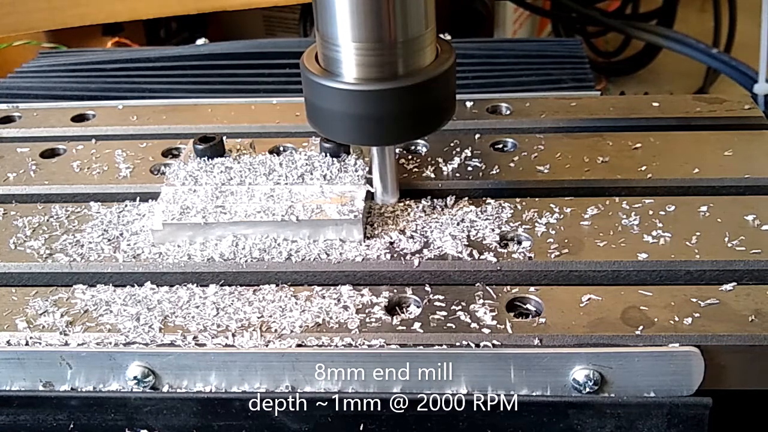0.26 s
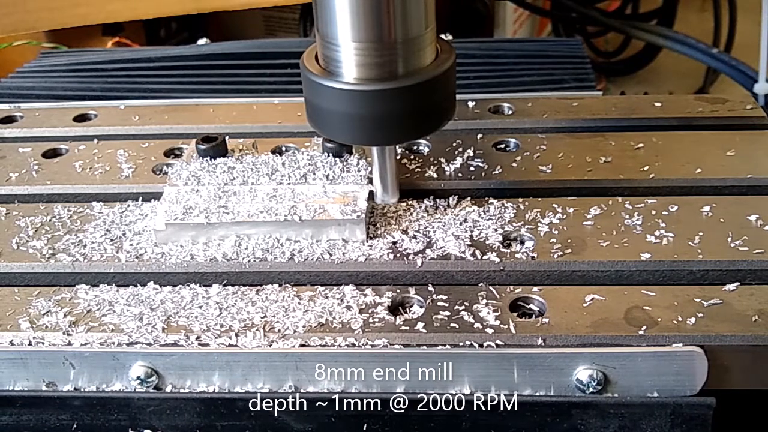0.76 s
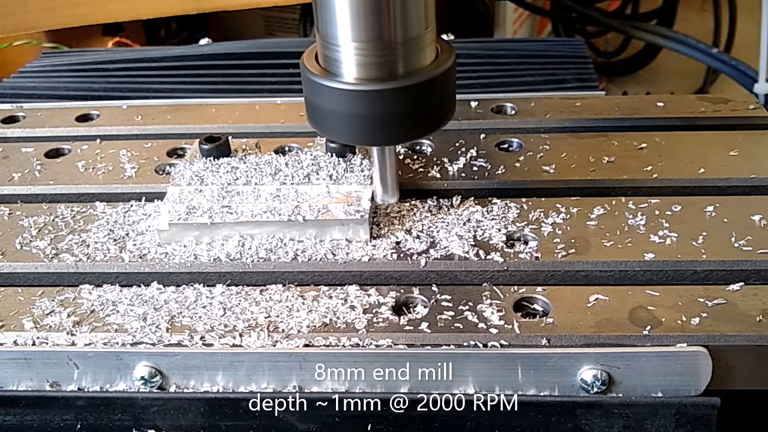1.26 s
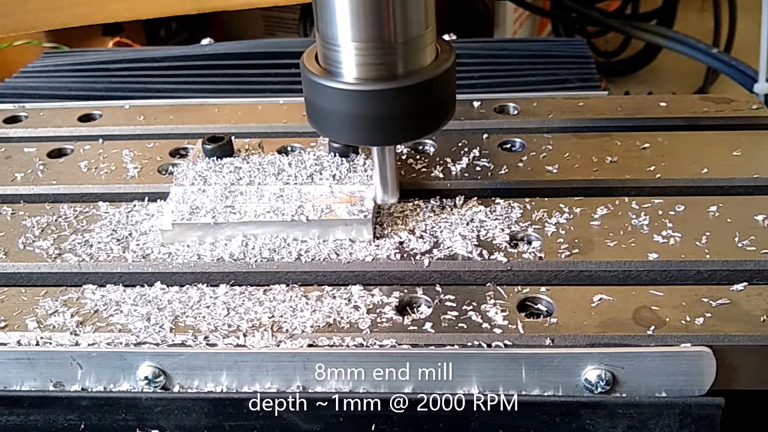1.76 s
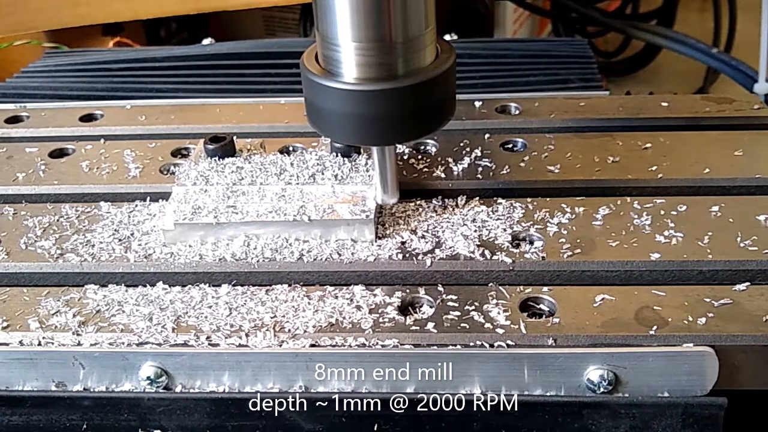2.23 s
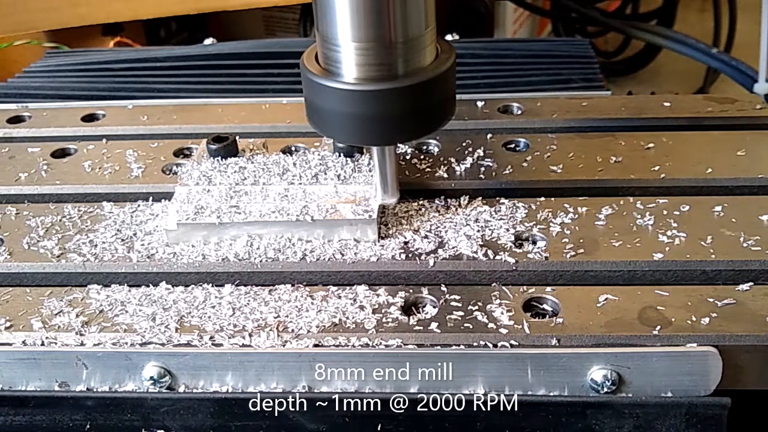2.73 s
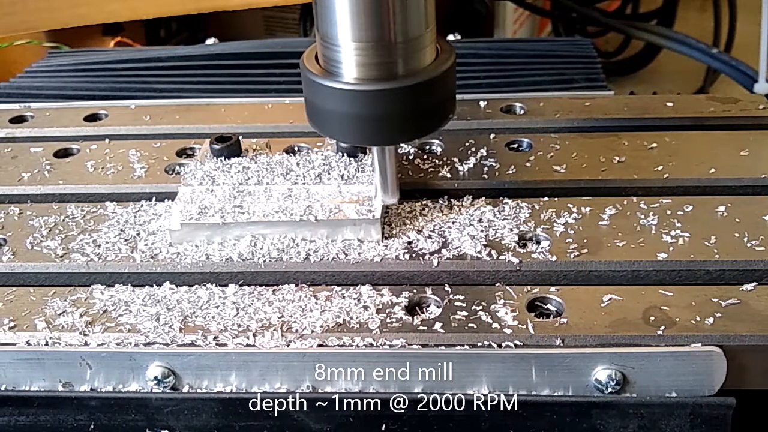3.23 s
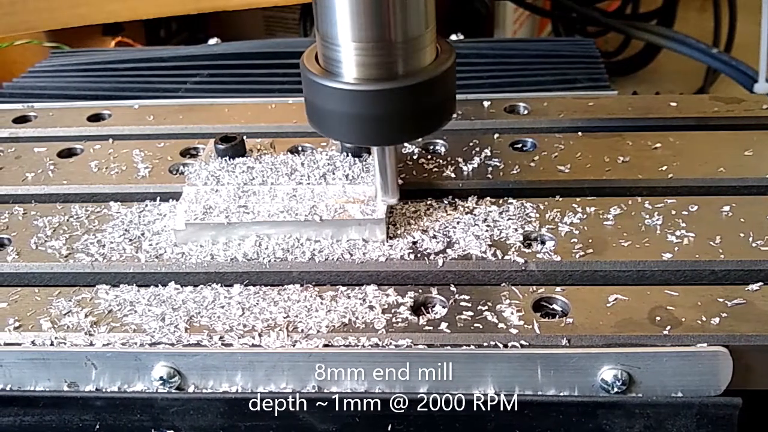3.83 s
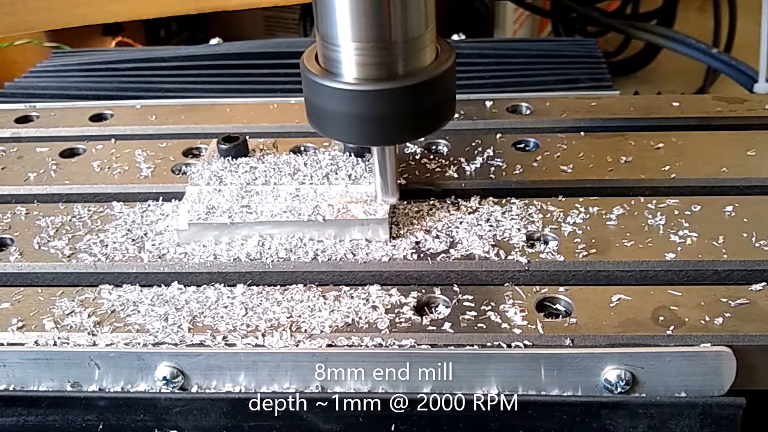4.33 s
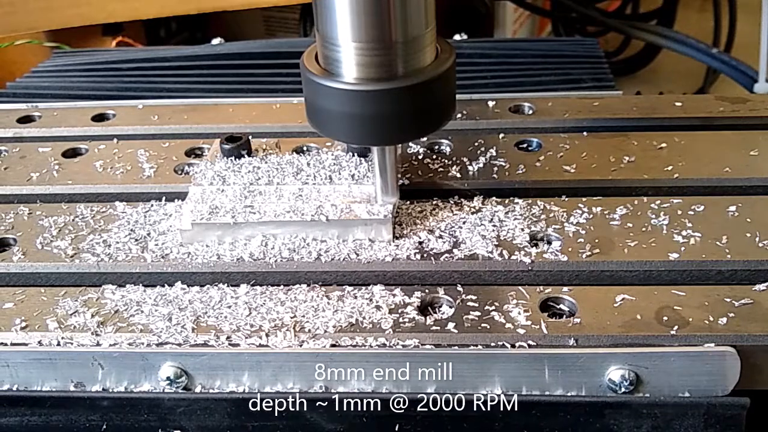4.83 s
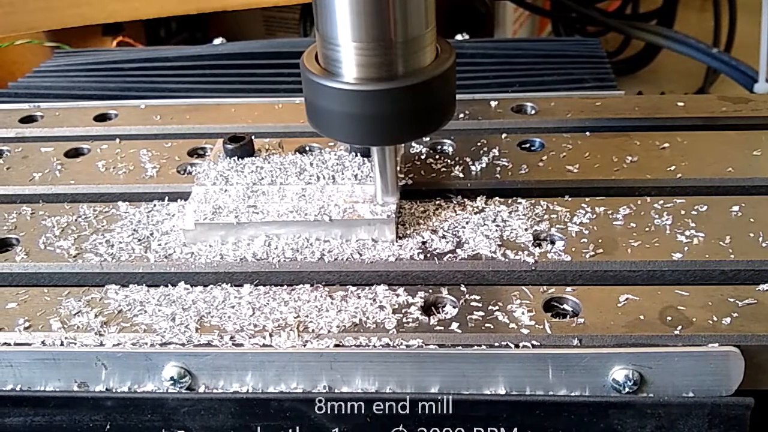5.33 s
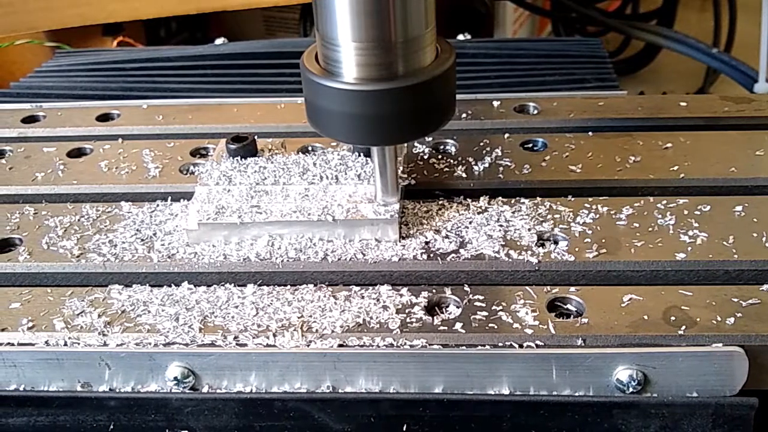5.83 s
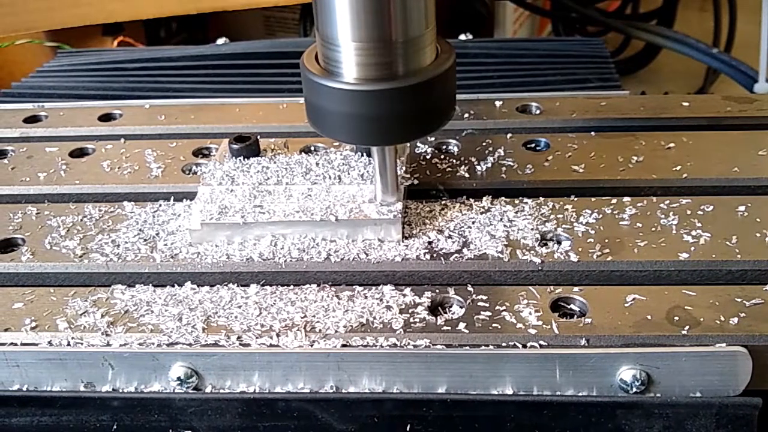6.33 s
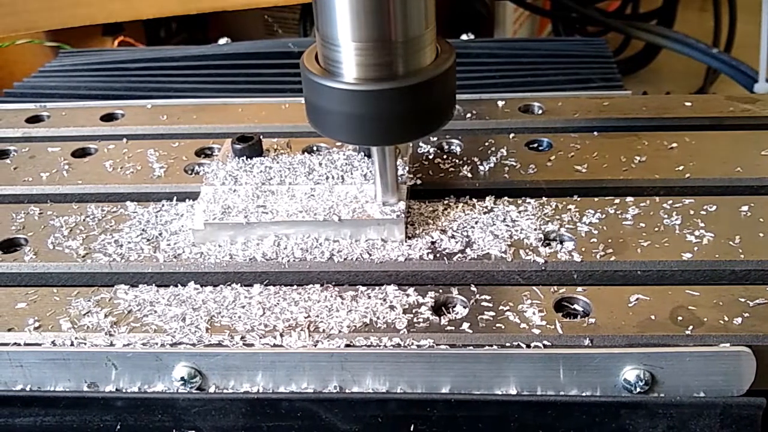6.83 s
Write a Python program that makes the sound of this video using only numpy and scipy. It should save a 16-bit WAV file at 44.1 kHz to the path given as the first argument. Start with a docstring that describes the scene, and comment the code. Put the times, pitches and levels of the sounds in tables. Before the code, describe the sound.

A small milling spindle idles with hiss and a singing belt whine, then its cutter bites aluminium in a droning, chattering, increasingly loud rattle.

```python
"""First a small milling machine idles: its frame rumbles, bearings hiss, the belt sings and the motor drive whines.
Then a four-flute cutter bites into aluminium: its teeth drone and thump, the frame chatters and chips scrape off.
Rumble, hiss, chatter and scrape are filtered noise; hums, belt, whine and drone are sines; bites are short rings.
The right channel is a shifted, recoloured copy of the left, mixed with unrelated sound."""
import sys
import numpy as np
from scipy import signal
from scipy.fft import rfft, irfft, next_fast_len
from scipy.io import wavfile
from scipy.ndimage import uniform_filter1d, map_coordinates

SR = 44100
rng = np.random.default_rng(int(sys.argv[2]) if len(sys.argv) > 2 else 0)


def output_pcm(signal):
    """Save a mono or channel-first signal as 16-bit PCM at the path in sys.argv[1].

    Samples are clipped to [-1, 1] before scaling.
    """
    pcm = np.clip(np.atleast_2d(signal).T, -1, 1) * 32767
    wavfile.write(sys.argv[1], SR, np.round(pcm).astype(np.int16))


N = 311787
TIME = np.arange(N) / SR  # seconds
SCATTER_GROWS = 0.09  # radians of unsteadiness that belt and drone gain per second of cutting
ENTRY_S = 0.04  # time scale for the tool sinking into the work


def amp(db):
    """Turn dB into gain."""
    return 10 ** (np.asarray(db) / 20)


def unit(x):
    """Scale to an average (rms) level of 1."""
    return x / np.sqrt(np.mean(x ** 2) + 1e-20)


def along(points, hz):
    """Read a curve of (Hz, value) points on a log frequency axis."""
    f, v = np.transpose(points)
    return np.interp(np.log(hz + 1), np.log(f + 1), v)


def wobble(rate):
    """A smooth random curve with this many random points a second."""
    return map_coordinates(rng.standard_normal(int(N * rate / SR) + 4), [TIME * rate])


def bumps(rows):
    """Add up smooth rises in dB; a negative height makes a dip."""
    return sum(db * np.exp(-((TIME - s) / length) ** 2) for s, db, length in rows)


def filtered(x, response):
    """Reshape the spectrum of x with a complex response of frequency."""
    m = next_fast_len(N + SR // 2)
    return irfft(rfft(x, m) * response(np.fft.rfftfreq(m, 1 / SR)), m)[..., :N]


def noise(patchy_db):
    """Two unrelated noises that share patches of random gain in time and frequency."""
    z = signal.stft(rng.standard_normal((2, N)), nperseg=512)[2]
    field = uniform_filter1d(rng.standard_normal(z.shape[1:]), size=8, axis=0)
    field = uniform_filter1d(field, size=6, axis=1)
    return signal.istft(z * amp(patchy_db * unit(field)), nperseg=512)[1][:, :N]


def tone(hz, db, unsteady_db):
    """A sine whose level and phase drift at random."""
    gain = np.sqrt(2) * amp(db + unsteady_db * wobble(7.6))
    return gain * np.sin(2 * np.pi * hz * TIME + 0.32 * unsteady_db * wobble(4.68))


# resonances of the frame; levels are relative: pitch_hz, width_hz, idle_level_db, chatter_level_db
FRAME_MODES = [(220, 62, -15, -9), (309.4, 39, -11.5, 0), (418, 68, -16.5, -5.5), (578, 62, -8, -0.5),
               (680, 98, 2.5, 4), (706, 72, 4, 4.5), (833, 40, -9.5, -9.5), (901, 24, -19, -9.5),
               (1029, 26, -28, -13.5), (1187, 26, -19, -10.5), (1249.6, 40, -10, -15),
               (1411, 28, -8.5, -23), (1566, 75, -9, -14.5), (1945, 37, -16, -30)]


def frame(force, column):
    """A force shakes the frame's resonances, each as strong as the chosen column says."""
    def modes(f):
        total = 0
        for k, mode in enumerate(FRAME_MODES):
            hz, width = mode[:2]
            resonance = 1j * f * width / (hz ** 2 - f * f + 1j * f * width)
            total = total + (-1) ** k * amp(mode[column]) * resonance  # neighbours have opposite signs
        return total
    return unit(filtered(force, modes))


def idle_rumble():
    """Noise shakes the frame while the spindle turns."""
    return amp(-36.0 + 0.35 * wobble(15)) * frame(noise(patchy_db=2.5), column=2)


POLES_HZ = 308.8  # how often the motor poles pass

# relative colour of bearings and belt: pitch_hz, level_db (per Hz)
HISS_COLOUR = [(40, -16), (110, -2.5), (180, -7), (500, 0), (950, -2), (1800, -4.5), (2350, -6),
               (3000, 0.5), (3400, -4), (4000, -2), (5200, -5.5), (6200, -1.5), (8300, -3), (9600, -4.5),
               (11900, -0.5), (13500, -2.5), (15500, -3.5)]
# humps that the spindle housing adds: pitch_hz, width_hz, lift_db
HOUSING_HUMPS = [(8950, 500, 4.5), (10750, 1100, 4), (12450, 600, 3), (14250, 600, 5)]


def bearing_hiss():
    """Bearings and belt make noise, which the motor poles pulse and the housing colours."""
    poles = 1 + 0.07 * np.sin(2 * np.pi * POLES_HZ * TIME)
    pulsed = noise(patchy_db=1.28) * amp(0.084 * wobble(38)) * poles

    def colour(f):
        lift_db = sum(db * np.exp(-((f - hz) / width) ** 2 * 2) for hz, width, db in HOUSING_HUMPS)
        return amp(along(HISS_COLOUR, f) + lift_db)
    hiss = amp(-30.5) * unit(filtered(pulsed, colour))
    treble = filtered(hiss, lambda f: 1 / (1 + (7000 / (f + 1)) ** 4))
    return hiss + treble * (amp(1.1 * wobble(110)) - 1)  # the treble flutters as a whole


# steady tones of motor and fans: pitch_hz, level_db (rms)
STEADY_TONES = [(100, -64), (200.3, -51), (400.6, -56), (524, -54), (1404, -51), (1428, -53)]
# hum that fades as the tool enters the work: pitch_hz, idle_level_db (rms)
IDLE_TONES = [(155, -60), (308.4, -49)]


def motor_tones():
    """Motor and fans hum on drifting sines; the idle hum gives way once the tool cuts."""
    steady = sum(tone(hz, db, 1) for hz, db in STEADY_TONES)
    idle = sum(tone(hz, db, 1) for hz, db in IDLE_TONES)
    return steady + idle * np.exp(-cutting() / ENTRY_S)


BELT_HZ, BELT_CLIMB_HZ, PULLEY_TEETH = 1233.3, 0.55, 48  # pitch at the start, its rise a second, teeth a turn
BELT_DB, BELT_SAG, BELT_WAVER_DB = -40.5, 0.85, 0.3  # idle dB; dB lost and waver dB gained a second of cutting
BELT_SWING = 0.15  # radians by which the tone's phase swings once a turn

# throbbing as the pulley turns: throbs_per_turn, depth_0_to_1, start_radians
BELT_THROBS = [(1, .58, -2.45), (2, .22, 2.0)]
# surges of the belt tone under load: time_s (middle), lift_db, length_s
BELT_SURGES = [(4.03, 10.5, 0.04), (4.41, 7, 0.015), (4.55, 12, .02), (5.4, 8, .03), (7.06, 13, 0.036)]


def belt_tone():
    """Belt teeth meeting the pulley sing a slowly rising tone that throbs with each turn."""
    cycles = (BELT_HZ + BELT_CLIMB_HZ * TIME / 2) * TIME
    turns = cycles / PULLEY_TEETH
    throb = 1 + sum(depth * np.cos(2 * np.pi * times * turns + start) for times, depth, start in BELT_THROBS)
    swing = BELT_SWING * np.sin(2 * np.pi * turns + BELT_THROBS[0][2])
    swing += SCATTER_GROWS * cutting() * wobble(20)
    level_db = BELT_DB + cutting() * (BELT_WAVER_DB * wobble(7.5) - BELT_SAG) + bumps(BELT_SURGES)
    return np.sqrt(2) * amp(level_db) * throb * np.sin(2 * np.pi * cycles + swing)


WHINE_HZ = 10820.9  # pitch of the drive tone

# drive tone (third row) and side tones, one pole rate apart from low to high: level_db (rms)
WHINE_LEVELS = [-55.5, -53.5, -45, -52.5, -53, -54.5]


def drive_whine():
    """The motor drive whines on one high tone with side tones spaced by the pole rate."""
    return sum(tone(WHINE_HZ + (k - 2) * POLES_HZ, db, 0.74) for k, db in enumerate(WHINE_LEVELS))


def spindle():
    """The turning spindle: rumble, hiss, motor tones, belt and drive whine together."""
    return idle_rumble() + bearing_hiss() + motor_tones() + belt_tone() + drive_whine()


FULL_DB = -27  # tool load at which the drone, thump and scrape levels hold
FLICKER_DB = 0.5  # unsteadiness of the load

# load on the tool before slack and flicker: time_s, load_db (as chatter level)
CUT_LOAD = [(1.88, -43), (1.92, -45), (2.02, -33), (2.65, -32.5), (3.2, -36), (3.5, -30), (3.65, -25),
            (3.74, -33.5), (3.95, -23.5), (4.3, -27.5), (4.87, -26.5), (5.059, -27.5), (5.2, -24.5),
            (5.4, -30.5), (5.97, -29.5), (6.03, -27.5), (6.3, -24.5), (6.6, -24.5), (6.851, -28),
            (7.07, -19)]
# moments when the tool runs light: time_s (middle), drop_db (negative lifts), length_s
SLACK_MOMENTS = [(2.10, 6.5, 0.026), (2.33, 11, 0.032), (2.53, 14, 0.03), (2.94, 6, 0.018), (3.1, 2, .04),
                 (3.43, 4, 0.017), (3.85, 2, 0.028), (4.44, 2, 0.046), (4.6, 5.5, 0.041), (4.78, 2, 0.078),
                 (4.93, 7.5, 0.03), (5.07, 6, 0.028), (5.7, -2.5, 0.098), (6.5, 4.5, 0.046),
                 (6.87, 3.5, 0.02)]


def tool_load():
    """The cut loads the tool: return the steady load, the slack and the resulting load, in dB."""
    s, db = np.transpose(CUT_LOAD)
    steady_db = np.interp(TIME, s, db, left=-120)  # practically silent before the cut
    slack_db = bumps(SLACK_MOMENTS)
    return steady_db, slack_db, steady_db - slack_db + FLICKER_DB * wobble(14)


def cutting():
    """Seconds since the tool met the work."""
    return np.clip(TIME - CUT_LOAD[0][0], 0, None)


# cutter speed: time_s, teeth_hz (teeth a second)
TOOTH_RATE = [(1.7, 102.6), (3.2, 102.5), (3.8, 103.0), (7.07, 103.1)]


def teeth_passed():
    """The turning cutter brings tooth after tooth: a running count with fractions."""
    return np.cumsum(np.interp(TIME, *np.transpose(TOOTH_RATE))) / SR + 0.75


WAVER_DB = 1.0  # own unsteadiness of each drone tone

# drone tones: times_tooth_rate (2.25 is nine times the turn rate), level_db (rms at full load and loudest time),
# growth (dB per dB of load), slack_share (of the drop), loudest_s, fall_db_per_s (away from loudest_s)
DRONE_TONES = [(1, -45, 0.051, 0.25, 3.4, 4), (2, -38.5, 0.41, 1.6, 2.04, 3), (3, -36, 0.072, 1.5, 2, 1.5),
               (4, -38.5, 0.26, 1.7, 1.44, 1.4), (6, -43, 0.8, 1.2, 1.4, 3.5),
               (7, -36.5, 0.43, 2.7, 1.8, 0.5), (2.25, -40.5, 0.59, 0.43, 7.5, 1.5)]
# swells and dips of the drone: time_s (middle), second_multiple_db, third_multiple_db, fourth_multiple_db, length_s
DRONE_SWELLS = [(1.96, 8, 0.5, -4, 0.045), (2.43, 4, -3, 5, 0.06), (2.95, 5.5, 0, 4.5, 0.14),
                (3.4, -26, 4, 10, 0.03), (3.54, -18, -8, 13.5, 0.09), (3.65, 10, 5, 11, 0.037),
                (3.93, 5, 5, 4, 0.036), (4.12, 10, 5, 11, 0.025), (4.22, 9.5, 6, 16, 0.071),
                (4.49, 14, -3, -9, 0.033), (4.7, 10, 9, 11.5, 0.065), (4.87, 15, 8, 10, .04),
                (5.17, 3, 0, 14.5, 0.19), (5.29, 1, 0, 0, 0.041), (5.53, -10, 5, 17, 0.029),
                (5.85, 14, 21.5, -7, 0.014), (6.05, 6, 10.5, 11, 0.054), (6.33, 10, 5, 17.5, 0.1),
                (6.6, 11, 10, 15.5, 0.05), (6.74, 12, 16, 13, 0.085), (7.039, 17, 21, 17, 0.12)]


def tooth_drone(count, steady_db, slack_db):
    """Teeth drone on multiples of the tooth rate, plus one tone at nine times the turn rate."""
    swells, drone = np.array(DRONE_SWELLS), 0
    for k, (times, db, grows, share, top_s, fall_db) in enumerate(DRONE_TONES):
        swell_db = bumps(swells[:, [0, k, 4]]) if 1 <= k <= 3 else 0
        level_db = db + grows * (steady_db - FULL_DB) + swell_db - fall_db * np.abs(TIME - top_s)
        level_db = level_db - share * slack_db + WAVER_DB * wobble(12)
        scatter = (0.3 + SCATTER_GROWS * cutting()) * wobble(9)  # radians
        drone = drone + np.sqrt(2) * amp(level_db) * np.sin(2 * np.pi * times * count + scatter)
    engaged = np.clip(cutting() / ENTRY_S, 0, 1) ** 2
    return engaged * drone


BLOW_DB, BLOW_GROWS = -35.5, 0.54  # tooth blows at full load; dB per dB of load

# relative colour of a tooth blow: pitch_hz, level_db
THUMP_COLOUR = [(30, -1), (70, -0.5), (130, -13), (200, -6.5), (231, 0), (262, 6.5), (308, -5.5), (390, 9),
                (513, -30), (615, -28), (718, -10), (822, 0), (900, -30), (1200, -19), (2000, -60) ]


def tooth_thump(tooth, size_db, luck, over_db):
    """Each tooth hits the work with a click of uneven strength, filtered into a thump."""
    strikes = np.diff(tooth, prepend=tooth[0]) > 0
    blows = strikes * amp(2.3 * size_db + 2.1 * np.clip(luck, -2, 1.5))
    return amp(BLOW_DB + BLOW_GROWS * over_db) * unit(filtered(blows, lambda f: amp(along(THUMP_COLOUR, f))))


RATTLE_DB = -2.5  # loose chatter between the bites, against the load


def loose_chatter(force, chatter_db, share):
    """Noisy cutting forces rattle the frame, less while a bite takes over."""
    chatter = frame(noise(patchy_db=3.0) * force * amp(chatter_db) * (1 - share), column=3)
    return chatter * amp(RATTLE_DB) * np.sqrt(np.mean(amp(chatter_db) ** 2))


LIGHT_DB, LIGHT_SPREAD_DB = 3.5, 2  # light bite strength over the load, and its random spread
LIGHT_HZ, LIGHT_SPREAD_HZ, LIGHT_S = 640, 52, 0.007  # pitch, its random spread, length in seconds


def light_bites(tooth, load_db):
    """Every flute bites lightly as it enters, the off-centre ones hardest: list the bites."""
    starts = np.flatnonzero(np.diff(tooth)) + 1
    luck = np.clip(rng.standard_normal((len(starts), 3)), -2, 1.5)
    rows = []
    for i, (a, b, c) in zip(starts, luck):
        if i / SR > CUT_LOAD[0][0]:
            level_db = load_db[i] + LIGHT_DB + LIGHT_SPREAD_DB * a
            rows.append((i / SR + 0.001 * c, level_db, LIGHT_HZ + LIGHT_SPREAD_HZ * b, LIGHT_S))
    return rows


# heavy bites: start_s, level_db (ring strength before its soft start and fade), pitch_hz, length_s
HEAVY_BITES = [(1.943, -18.5, 698, 0.012), (1.983, -17.5, 656, 0.0096), (2.02, -20.5, 627, 0.0091),
               (2.046, -17.5, 605, 0.0083), (2.177, -19.5, 660, 0.0088), (2.217, -20.5, 634, 0.0096),
               (2.255, -23, 670, 0.014), (2.369, -22, 660, 0.017), (2.404, -20.5, 690, 0.011),
               (2.448, -17.5, 666, 0.0095), (2.559, -20, 706, 0.013), (2.606, -19, 654, 0.0093),
               (2.644, -19, 697, 0.0066), (2.674, -21, 680, 0.015), (2.753, -22.5, 704, 0.018),
               (2.801, -22, 686, 0.014), (2.998, -18, 630, 0.0072), (3.027, -13, 694, 0.0034),
               (3.075, -20, 654, 0.0058), (3.107, -22, 650, 0.0092), (3.152, -20.5, 650, .01),
               (3.546, -16, 655, 0.0099), (3.61, -16, 640, 0.0067), (3.636, -14, 700, 0.0069),
               (3.647, -14, 594, 0.013), (3.766, -23, 583, .01), (3.883, -19, 620, 0.016),
               (3.93, -15, 613, 0.01), (3.973, -16.5, 666, 0.015), (4.005, -19.5, 604, 0.017),
               (4.043, -20.5, 594, 0.018), (4.1, -22, 580, 0.011), (4.135, -15, 680, 0.0076),
               (4.178, -19, 654, 0.0067), (4.246, -14, 650, .008), (4.27, -13, 644, 0.0051),
               (4.321, -15.5, 634, 0.0079), (4.337, -20, 654, .006), (4.359, -13.5, 680, 0.011),
               (4.464, -17, 586, 0.0065), (4.476, -13, 640, 0.011), (4.527, -17, 673, 0.013),
               (4.543, -19, 656, 0.0055), (4.555, -21, 681, 0.0058), (4.606, -22.5, 680, 0.0098),
               (4.655, -17, 704, 0.0064), (4.679, -14.5, 685, 0.013), (4.746, -13, 645, 0.0073),
               (4.814, -15, 616, 0.005), (4.84, -17, 660, 0.01), (4.853, -13.5, 624, 0.0093),
               (4.864, -12.5, 623, 0.0095), (4.88, -12, 700, 0.0074), (4.957, -19, 670, 0.008),
               (4.979, -13.5, 625, 0.0067), (5.002, -16, 730, .005), (5.022, -20, 705, 0.006),
               (5.109, -18, 675, 0.0078), (5.141, -13.5, 650, 0.0075), (5.18, -13, 689, 0.016),
               (5.202, -15, 634, .006), (5.26, -17, 646, .006), (5.305, -20, 677, .006),
               (5.325, -21, 620, 0.0073), (5.355, -18, 665, 0.0071), (5.457, -15.5, 660, 0.0069),
               (5.526, -15, 665, 0.0043), (5.551, -15, 720, 0.006), (5.637, -16.5, 635, 0.012),
               (5.681, -17, 624, 0.0054), (5.692, -17, 705, 0.0092), (5.727, -17, 626, 0.0072),
               (5.742, -15, 621, 0.0049), (5.758, -17, 648, 0.0068), (5.804, -18.5, 676, 0.0083),
               (5.84, -19, 653, 0.013), (5.861, -15, 676, 0.0052), (5.872, -20, 647, .006),
               (6.008, -16, 660, 0.006), (6.024, -16, 650, 0.0055), (6.046, -19, 623, 0.018),
               (6.064, -16, 650, 0.014), (6.078, -20, 724, 0.012), (6.093, -11, 670, .005),
               (6.113, -13.5, 625, 0.0072), (6.195, -16, 670, 0.014), (6.215, -13, 667, 0.01),
               (6.228, -12.5, 676, 0.0053), (6.274, -11.5, 700, 0.01), (6.35, -12.5, 673, 0.014),
               (6.367, -15, 630, 0.0065), (6.391, -13, 695, 0.0083), (6.446, -16, 650, 0.0075),
               (6.456, -15, 664, 0.0067), (6.495, -13.5, 634, 0.0054), (6.519, -15, 675, 0.0066),
               (6.572, -10.5, 647, 0.0085), (6.585, -14.5, 704, 0.022), (6.626, -19, 680, 0.0061),
               (6.65, -13, 600, 0.0076), (6.659, -9.5, 643, 0.0045), (6.673, -11, 630, .005),
               (6.736, -19.5, 700, 0.013), (6.753, -17, 610, .009), (6.814, -16, 610, 0.0067),
               (6.845, -19, 721, 0.0078), (6.891, -14, 660, 0.011), (6.91, -25, 681, .008),
               (6.958, -13, 635, 0.007), (7.002, -18.5, 656, 0.012), (7.025, -10, 604, 0.0054),
               (7.036, -12.5, 605, 0.011)]


def bites(rows):
    """A bite locks the chatter to one pitch for a few cycles; also returns how far it takes over."""
    out, share, t = np.zeros(N + SR), np.zeros(N + SR), np.arange(SR // 25) / SR
    turns = rng.uniform(0, 2 * np.pi, size=(len(rows), 2))
    for (s, db, hz, length), turn in zip(rows, turns):
        ring = np.sin(2 * np.pi * hz * t + turn[0])
        ring += 0.077 * np.sin(2 * np.pi * 1.26 * hz * t + turn[1])
        hold = (1 - np.exp(-t / 0.0018)) * np.exp(-(t / length) ** 4)
        out[round(s * SR):][:len(t)] += amp(db) * hold * ring
        hush = np.exp(-(t / (length + 0.008)) ** 4)
        share[round((s - 0.006) * SR):][:len(t)] += 0.75 * hush  # starts just before the ring
    return out[:N], np.clip(uniform_filter1d(share[:N], size=90), 0, 0.8)


CHIP_DB, CHIP_GROWS = -35.5, 0.88  # scrape at full load; dB per dB of load
BITE_CHIPS_DB = 2.2  # extra scrape per unit of bite share: a bite tears chips harder

# relative colour of chips tearing off: pitch_hz, level_db (per Hz)
SCRAPE_COLOUR = [(800, -32), (1000, -8), (1300, 2.5), (1560, -2), (1800, -7), (1930, -13.5), (2300, -6.5),
                 (4000, -15), (9000, -17), (16000, -50)]


def chip_scrape(force, luck, over_db, share):
    """Chips tear off as filtered noise that pulses with each tooth."""
    chips = noise(patchy_db=2.5) * force * amp(1.5 * luck)
    scrape = unit(filtered(chips, lambda f: amp(along(SCRAPE_COLOUR, f))))
    return amp(CHIP_DB + CHIP_GROWS * over_db + BITE_CHIPS_DB * share) * scrape


# bite of each flute in turn, scaled again for thump and grip: bite_db
FLUTE_BITE = [0, -2.5, -6, -1]


def cutter():
    """The uneven teeth drive the drone, thumps, chatter, bites and scrape together."""
    steady_db, slack_db, chatter_db = tool_load()
    over_db = chatter_db - FULL_DB
    count = teeth_passed()
    tooth, within = count.astype(int), count % 1
    luck = rng.standard_normal((tooth[-1] + 1, 3))[tooth]
    size_db = np.array(FLUTE_BITE)[tooth % len(FLUTE_BITE)]  # an off-centre tool loads one flute most
    contact = within * np.exp(-3.5 * within) + 0.2  # the chip load rises fast and tails off
    force = contact * amp(0.8 * size_db + 1.0 * luck[:, 1])
    heavy, share = bites(HEAVY_BITES)
    light = bites(light_bites(tooth, chatter_db + size_db))[0] * (1 - share)
    drone = tooth_drone(count, steady_db, slack_db) * (1 - 0.25 * share)
    thump = tooth_thump(tooth, size_db, luck[:, 0], over_db)
    chatter = loose_chatter(force, chatter_db, share)
    return drone + thump + chatter + light + heavy + chip_scrape(force, luck[:, 2], over_db, share)


# right channel against left: pitch_hz, left_minus_right_db, likeness_0_to_1, phase_shift_radians
CHANNEL_DIFFERENCES = [(40, 3, .1, -1), (100, 5, .45, -.8), (150, -4, .2, 0), (200, -6, .85, 2.5),
                       (237, 0, .87, 1.9), (280, 2, .68, 1.9), (320, 6, .64, 3.2), (366, 0, .55, 5.5),
                       (409, 9, .85, 6.2), (452, 0, .55, 6), (517, 6, .5, 6.5), (581, 3, .95, 6),
                       (711, 3, .97, 6.3), (840, 6, .45, 6.5), (904, -2, .83, 6.3), (1100, 0, .7, 6.4),
                       (1227, 3, .95, 6.5), (1421, 4, .75, 6.2), (1486, -2, .5, 7.3), (1550, 1, .84, 7.2),
                       (1700, -3, .6, 6.8), (2030, -1, .3, 8.9), (2200, 0, .85, 9.4), (2450, 1, .4, 9.6),
                       (2756, 1, .3, 11.6), (3300, 0, .8, 12.6), (3620, 1, .5, 12.8), (3850, 1, .25, 14.2),
                       (4200, 0, .45, 15.3), (4400, 0, .98, 15.7), (4600, 0, .92, 15.75),
                       (4850, 1, .45, 16), (5200, 2, .15, 17.2), (5685, 2, .65, 18.85), (6950, 3, .55, 22),
                       (8270, 9, .3, 25.2), (8960, 8, .6, 27), (9650, 10, .3, 28.9), (11025, 9, .65, 32.2),
                       (12400, 9, .6, 35.8), (13100, 9, .4, 37.5), (14470, 7, .6, 41),
                       (15700, 9, .35, 44.3)]


def scene():
    """The right channel is a shifted, recoloured copy of the left, mixed with unrelated sound;
    likeness and phase are set by frequency."""
    left, other = spindle() + cutter()  # same tones and bites, unrelated noises
    hz, lr_db, alike, shift = np.transpose(CHANNEL_DIFFERENCES)
    alike = np.clip(alike, 0, 1)

    def recolour(f):
        return amp(-np.interp(f, hz, lr_db)) * np.exp(-1j * np.interp(f, hz, shift))
    right = filtered(left, lambda f: recolour(f) * np.interp(f, hz, alike))
    right += filtered(other, lambda f: recolour(f) * 1j * np.sqrt(1 - np.interp(f, hz, alike) ** 2))
    return np.array([left, right])


TOP_HZ = 15530  # nothing is kept from here up


def record(dry):
    """The pickup weakens the deep bass and keeps nothing above its band limit."""
    return filtered(dry, lambda hz: (hz < TOP_HZ) / (1 + (70 / (hz + 1)) ** 2))


dry = scene()
out = record(dry)
output_pcm(out)
```